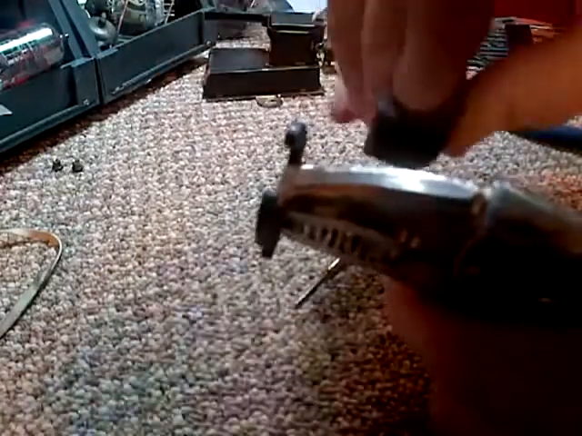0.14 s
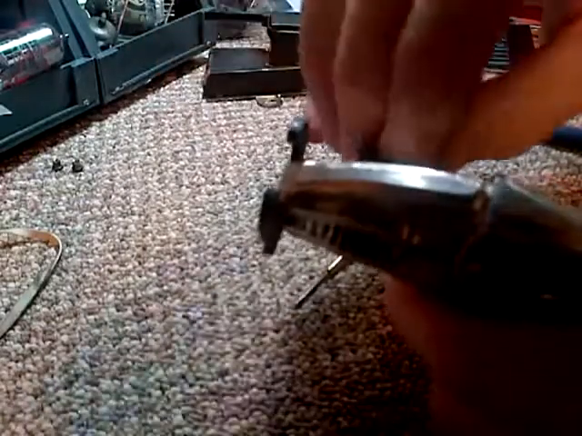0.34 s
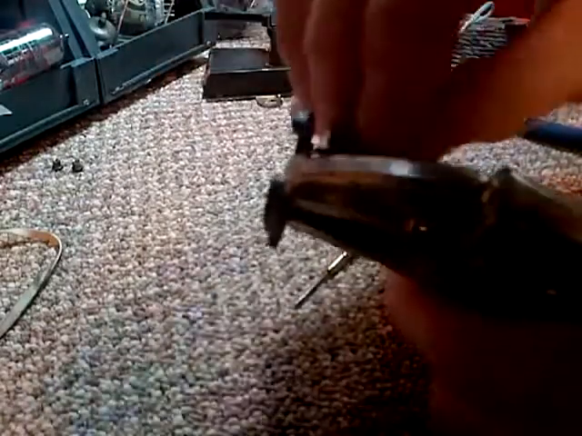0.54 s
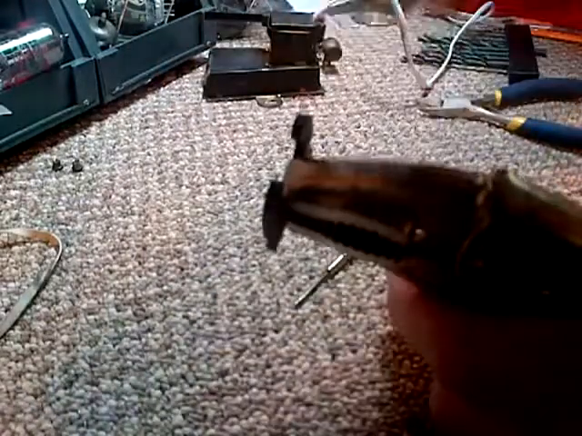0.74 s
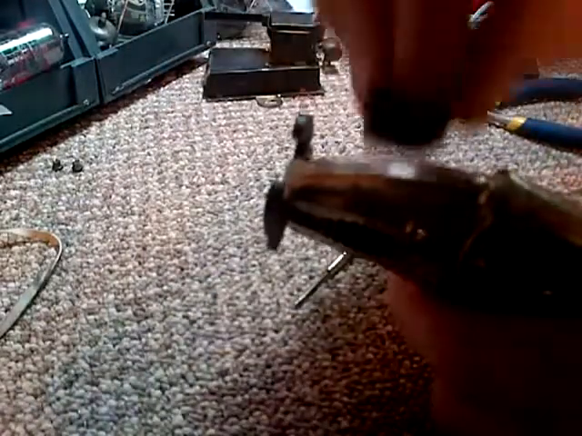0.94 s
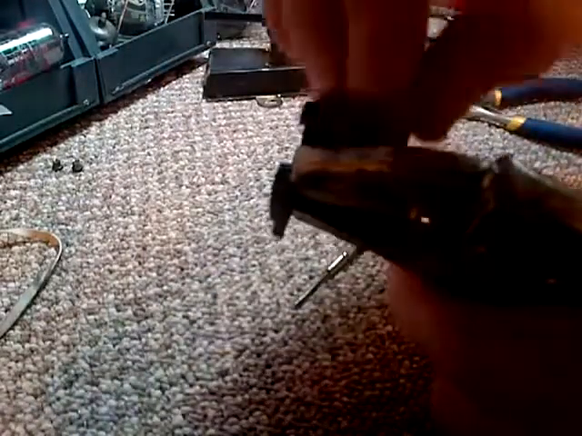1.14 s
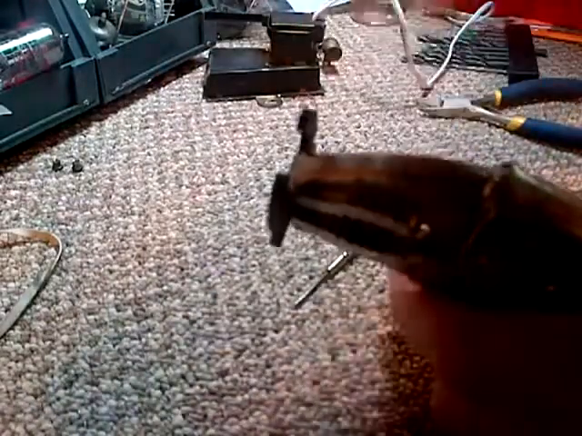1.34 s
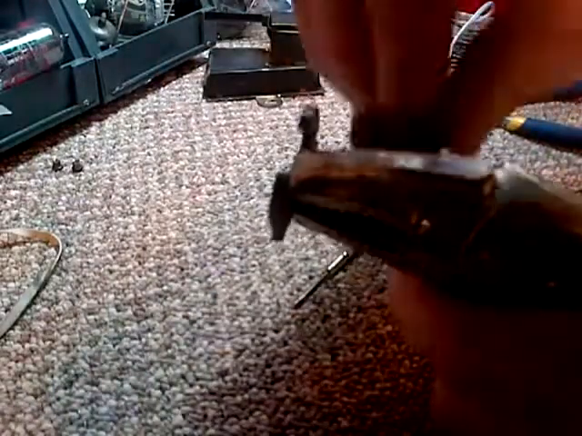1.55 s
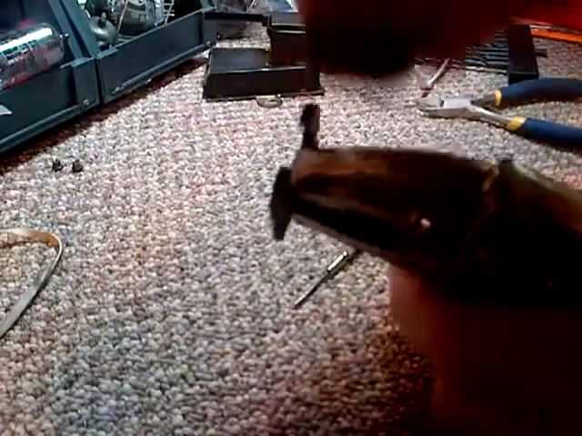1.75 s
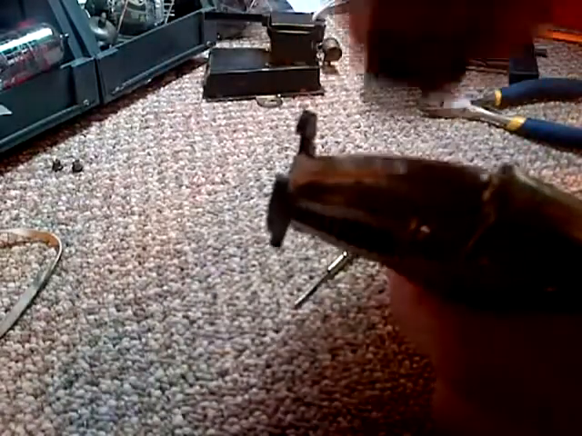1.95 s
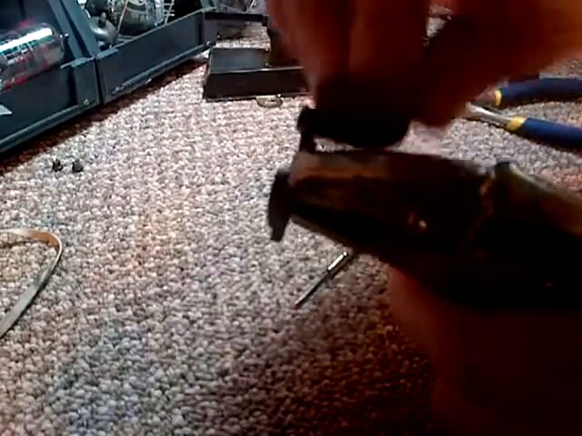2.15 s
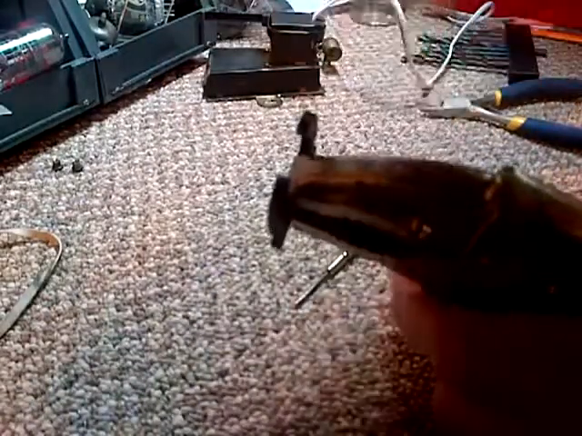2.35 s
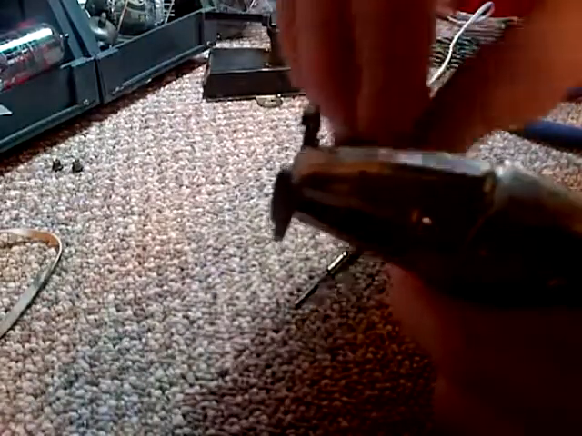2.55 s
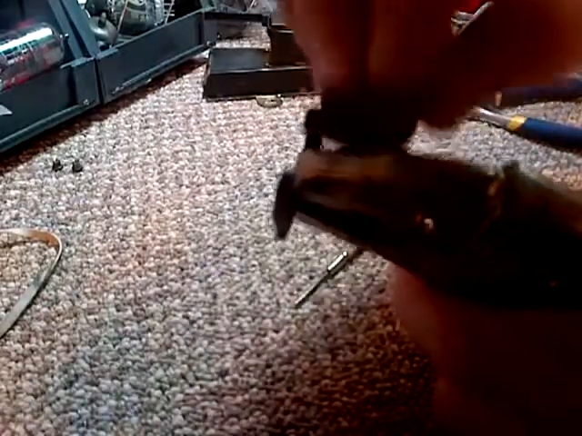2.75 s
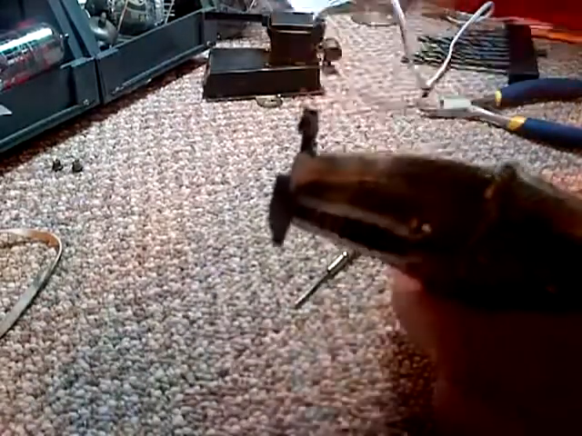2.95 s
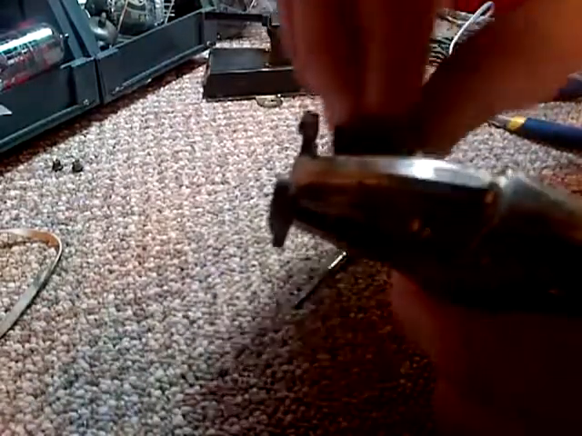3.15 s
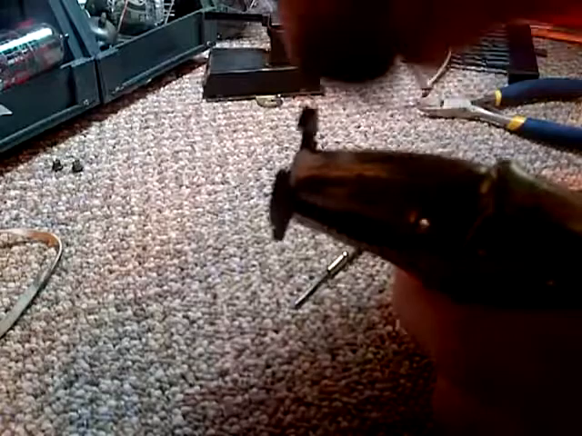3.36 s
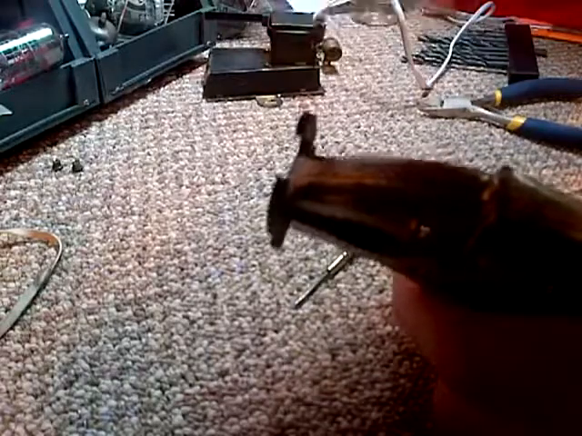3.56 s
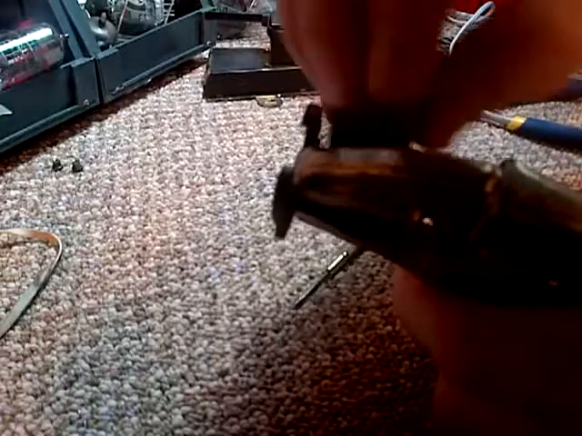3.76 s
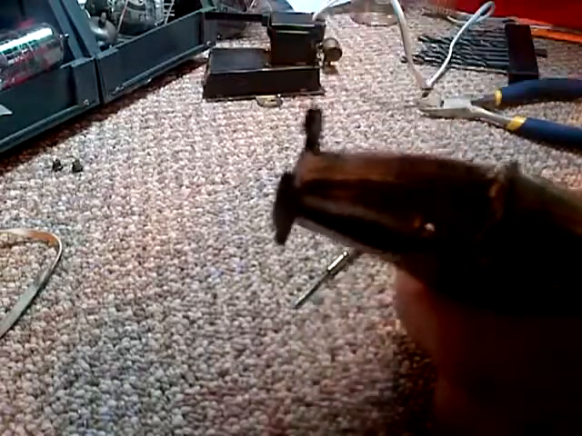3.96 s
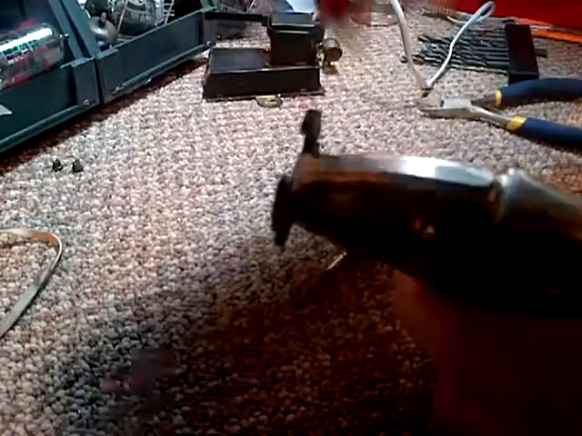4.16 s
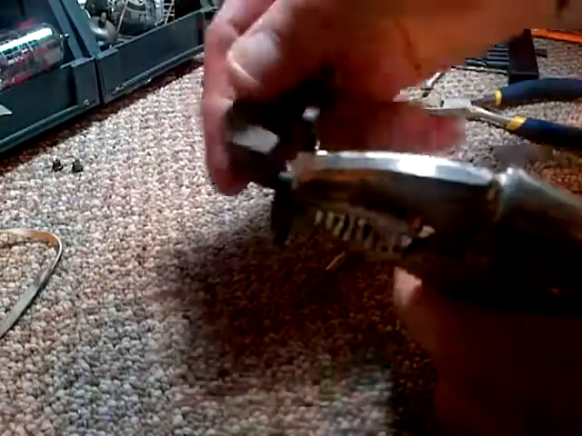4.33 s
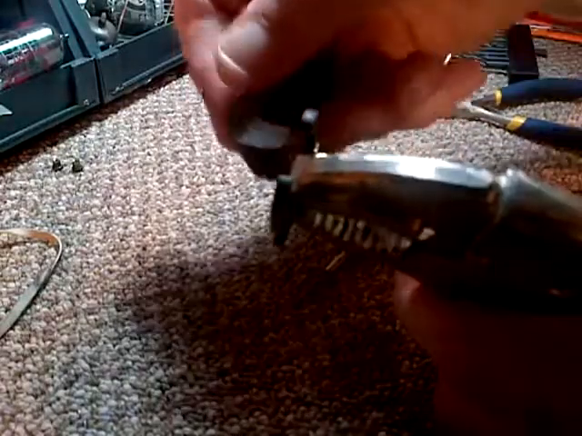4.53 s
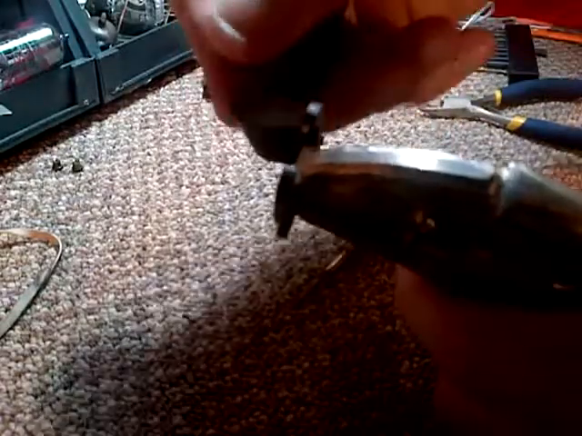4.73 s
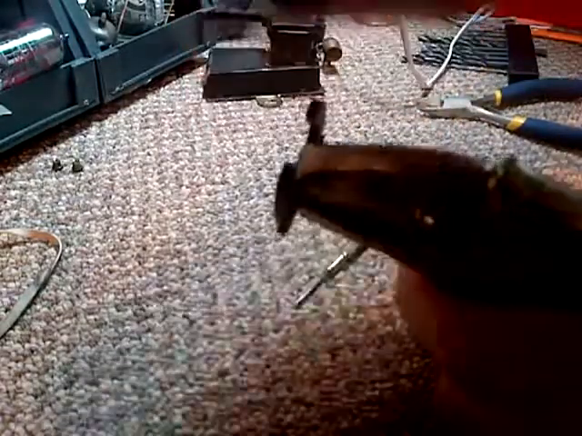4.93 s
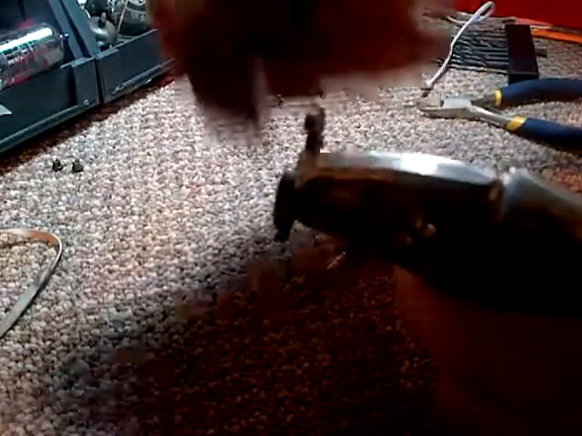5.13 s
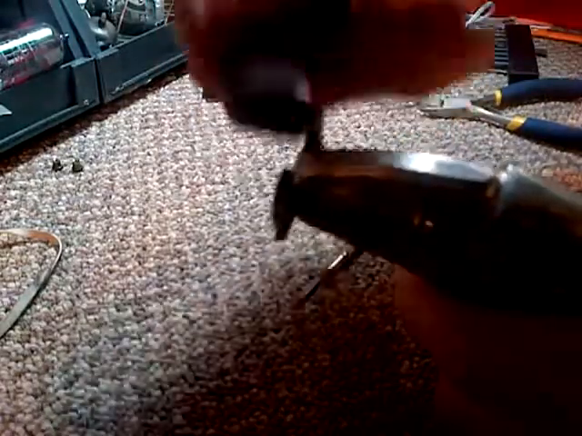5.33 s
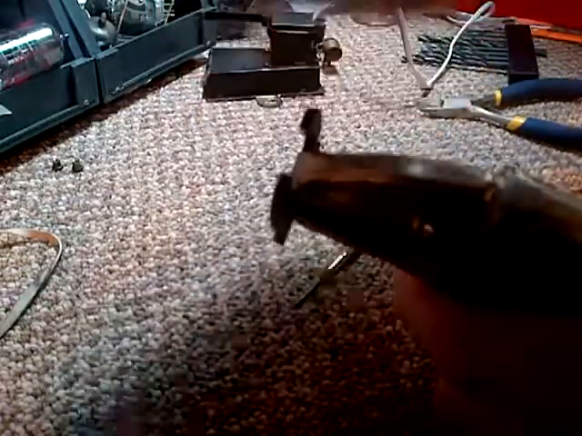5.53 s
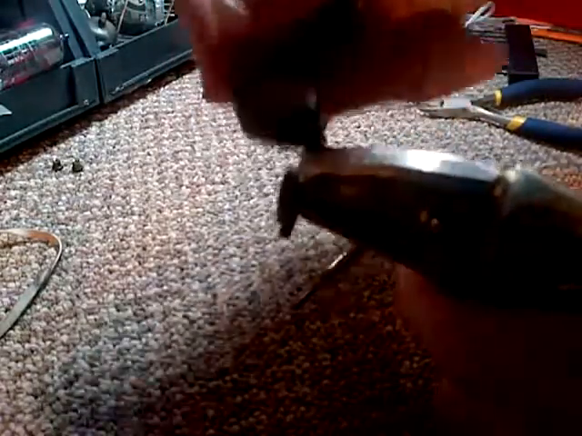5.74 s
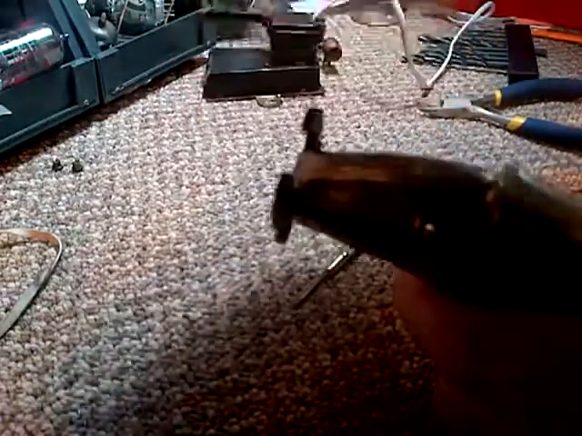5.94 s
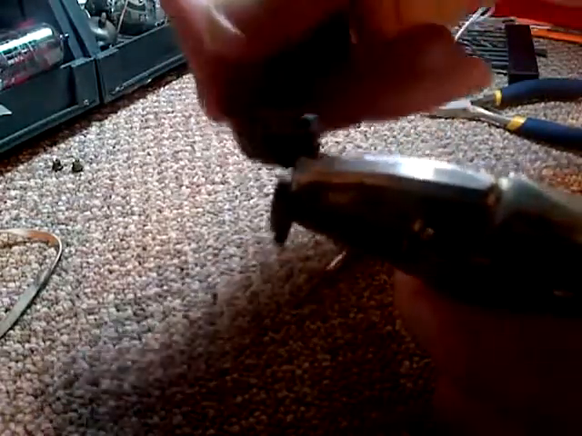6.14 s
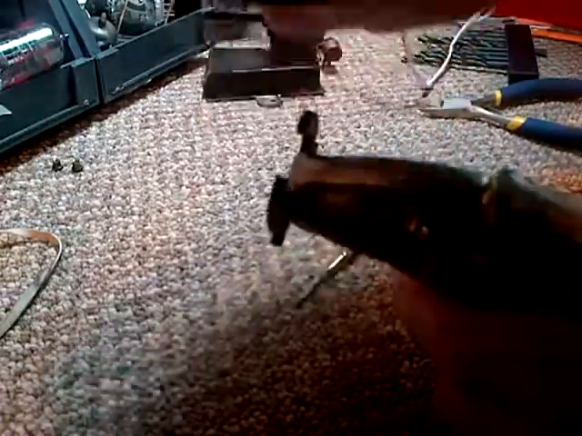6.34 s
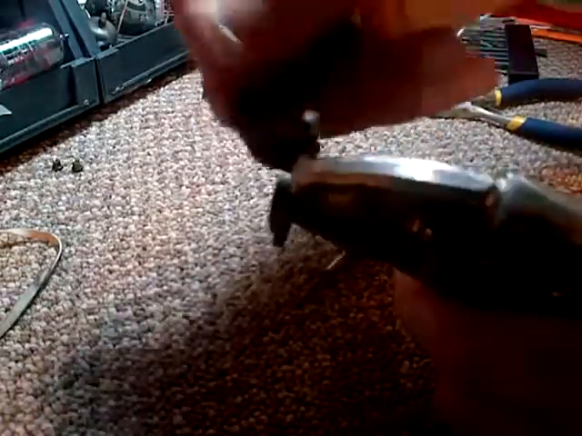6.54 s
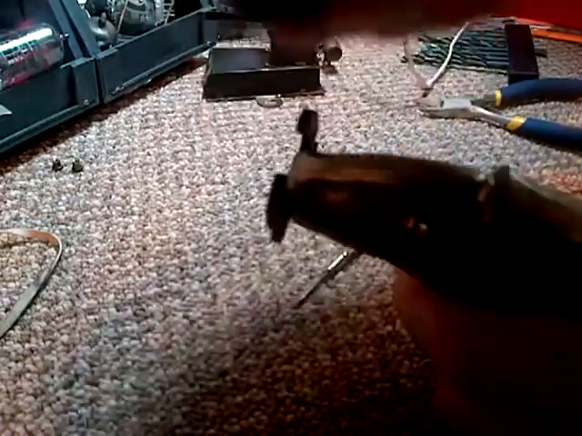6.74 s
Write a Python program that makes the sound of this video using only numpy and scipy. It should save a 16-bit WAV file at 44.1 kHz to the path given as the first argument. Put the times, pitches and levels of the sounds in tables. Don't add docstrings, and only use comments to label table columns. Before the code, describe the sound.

Very close to a stereo microphone, a hand snaps a small magnet onto a steel part about twice a second. Each hard click is followed by a tiny gritty scrape and a softer tear-off tick with a short thin ring. Soft low hand thumps accompany some hits. Later snaps, at the tip, are cleaner and pingier. Steady hiss, motor hum and low rumble lie underneath in a small, dry carpeted room.

```python
import sys
import numpy as np
from scipy import signal
from scipy.fft import rfft, irfft
from scipy.io import wavfile
from scipy.ndimage import uniform_filter1d

SR = 44100
rng = np.random.default_rng(int(sys.argv[2]) if len(sys.argv) > 2 else 0)


def bounce(signal):
    frames = np.transpose(np.atleast_2d(signal))
    limited = np.clip(frames, -1, 1)
    pcm = np.round(limited * 32767).astype(np.int16)
    wavfile.write(sys.argv[1], SR, pcm)


def boost_factor(decibels):
    exponent = np.asarray(decibels, float) / 20
    return 10 ** exponent


N = 299439
TIP_FROM_S = 4.5
TIP_SHADOW_DB, LEFT_LAG_S = -3.5, 17 / SR

# start t/s, peak level/dB, bass level/dB, treble level/dB, favoured mode f/Hz
TEAR_OFFS = [(0.6847, -14, -12, -4, 8700), (0.733, -11.5, -15.5, -9.5, 8200), (1.2909, -11, -19, -9, 6040),
             (1.807, -11, -20, -8.5, 4460), (2.2752, -13, -30, -3, 8560), (3.424, -13.5, -24, -7.5, 4460),
             (3.911, -13.5, -30, -7.5, 4460), (4.888, -14, -16.5, -17.5, 5270),
             (5.8104, -12, -32, -18, 5500), (6.6874, -8.5, -52, -12.5, 5820)]


def evened(x):
    return x / np.sqrt(np.mean(x ** 2) + 1e-20)


def read(points, hz):
    f, value = np.transpose(points)
    return np.interp(np.log(hz + 1), np.log(f + 1), value)


def add(mix, s, sound):
    part = mix[:, round(s * SR):][:, :sound.shape[1]]
    part += sound[:, :part.shape[1]]


def air():
    # f/Hz, level/dB per Hz
    colour = [(12, -26), (20, 1), (70, -1), (177, -10), (319, -15.5), (377, -17), (660, -22), (759, -24.5),
              (3340, -33.5), (3630, -33.5), (4420, -33.5), (14700, -36.5), (16000, -41)]
    # f/Hz, correlation [-1..1]
    likeness = [(60, 0.26), (240, 0.084), (950, 0.099), (3770, 0.053), (15000, -0.019)]
    # f/Hz, level/dB
    balance = [(60, 0), (180, -2.5), (550, -4), (1650, -2.5), (4970, -1.5), (15000, -1.0)]
    # t/s, level/dB
    rumble = [(0.0, -64), (0.05, -47), (0.76, -42.5), (0.83, -51), (1.44, -43.5), (1.55, -50.5),
              (1.83, -41.5), (2.02, -53), (2.08, -41), (3.08, -47.5), (3.21, -33.5), (3.27, -47),
              (3.33, -38), (3.46, -43.5), (6.17, -43), (6.2, -48), (6.79, -40.5)]
    hum_hz, hum_width_hz, hum_db = 57, 4.7, 8.5
    frames, hz = N // 1024 + 5, np.fft.rfftfreq(4096, 1 / SR)
    a, b, c, d = rng.standard_normal((frames, 2049, 4)).T
    same = np.clip(read(likeness, hz), -1, 1)[:, None]
    right = a + 1j * b
    left = same * right + np.sqrt(1 - same ** 2) * (c + 1j * d)
    s, rumble_db = np.transpose(rumble)
    swell_db = np.interp(np.arange(frames) * 1024 / SR, s, rumble_db + 43.5)
    swell_db = swell_db / (1 + (hz[:, None] / 90) ** 4)
    swell_db += hum_db / (1 + ((hz[:, None] - hum_hz) / hum_width_hz) ** 2)
    lean_db = read(balance, hz)[:, None] / 2
    tilt_db = np.array([lean_db, -lean_db])
    z = np.array([left, right]) * boost_factor(read(colour, hz)[:, None] + swell_db + tilt_db)
    noise = signal.istft(z, nperseg=4096, noverlap=3072)[1][:, :N]
    return boost_factor(-37) * evened(noise)


def knock(db, hz, t60):
    t = np.arange(round(t60 * SR)) / SR
    band = signal.butter(2, [hz * 0.75, hz * 1.25], "bandpass", fs=SR, output="sos")
    a, b = signal.sosfilt(band, rng.standard_normal((2, len(t))))
    attack = np.minimum(t / .012, 1)
    return evened(np.array([0.9 * a + .5 * b, a])) * boost_factor(db - 60 * t / t60) * attack


def floor_knocks(mix):
    # t/s, level/dB, pitch f/Hz, t60 t/s
    thumps = [(0.6, -30, 122, 0.17), (1.228, -27.5, 98, 0.13), (1.741, -26, 99, 0.27),
              (2.179, -21, 94, 0.14), (2.651, -23.5, 94, 0.095), (3.326, -17.5, 85, 0.098),
              (3.819, -35, 97, 0.21), (5.301, -35, 100, 0.071)]
    # t/s, level/dB, pitch f/Hz, t60 t/s
    thud = [
        (4.136, -26, 276, 0.11),
        (4.19, -43, 295, 2.3),
    ]
    for s, *row in thumps + thud:
        add(mix, s, knock(*row))


def room(x):
    t = np.arange(8000) / SR
    tail = rng.standard_normal((2, len(t))) * boost_factor(-60 * t / 0.13) * (t > .003)
    return boost_factor(-18.0) * signal.fftconvolve(x[1:], tail / np.linalg.norm(tail[0]), axes=1)[:, :N]


def ring(hz, db, t60, shadow_db, size):
    # f/Hz, level/dB
    shadow = [(300, -26), (700, 9.5), (1400, -6.5), (3200, -1), (4300, -12), (5500, -24), (8500, -12.5),
              (12000, 9)]
    t = np.arange(size) / SR
    pole = (2j * np.pi * hz - np.log(1000) / t60)[:, None, None]
    waves = (np.exp(pole * t[::100, None]) * np.exp(pole * t[:100])).reshape(len(hz), size)
    left_gain = boost_factor(read(shadow, hz) + shadow_db * (hz < 7000))
    left = left_gain * np.exp(1j * rng.standard_normal(len(hz)))
    start = boost_factor(db) * np.exp(.6j * rng.standard_normal(len(hz)))
    out = (np.array([left * start, start]) @ waves).imag
    out[0] = np.interp(t - LEFT_LAG_S, t, out[0], left=0)
    return out


def steel(s, favoured_hz, grip, favour_db=11.0):
    # f/Hz, flank level/dB, tip level/dB, t60 t/s
    modes = [(594, -43, -41, 0.12), (708, -9, -32, 0.067), (1177, -1.5, -1, 0.45), (1340, 0, -26, 0.19),
             (1420, 4, 6, 0.12), (1620, 2, -2, 0.13), (1714, -0.5, -44, 0.069), (1827, 3, 11.5, 0.17),
             (2140, 2, 9, 0.024), (2904, -21, 7, 0.067), (3253, 4, -8, 0.1), (3354, 14, 13.5, 0.069),
             (4150, 8.5, -60, 0.15), (4290, -36, -7, 0.035), (4460, 20, 22.5, 0.09), (4580, 1.5, 12, 0.2),
             (4900, -6, -18, 0.12), (5460, 8, -23, 0.084), (5220, 20, 26.5, 0.025), (6078, 10.5, 20, 0.054),
             (6220, 17.5, 10.5, 0.072), (6320, 16, 25.5, 0.029), (7400, 12.5, 5, 0.12),
             (7820, 22.5, -24, 0.015), (8700, -24, -35, 0.07), (8590, 21.5, 19, 0.031),
             (9160, 13.5, 12, 0.033), (9780, 5.5, 2, 0.055), (11130, 11, -6, 0.051)]
    # f/Hz, level/dB against the main modes
    dense = [(450, -24), (700, -17), (930, -70), (1400, -15), (2500, -26), (3200, -17), (3700, -48),
             (4500, -13), (6300, -4), (6900, -4.5), (9000, 0.5), (11400, -14.5), (12300, -22), (16000, -48)]
    hz, flank_db, tip_db, t60 = np.transpose(modes)
    tip = s > TIP_FROM_S
    db = (tip_db if tip else flank_db) + 4.5 * rng.standard_normal(len(hz))
    db = db + favour_db * np.exp(-(np.log(hz / favoured_hz) / .07) ** 2)
    t60 = 1 / (1 / t60 + grip)
    small_hz = np.linspace(450, 16000, 160) + rng.uniform(-45, 45, 160)
    small_db = read(dense, small_hz) + np.median(db)
    small_db = small_db - 14 * tip * (small_hz < 1000)
    shadow_db = tip * TIP_SHADOW_DB
    parts = []
    for lo, hi in ((0, 2400), (2400, 6900), (6900, SR)):
        big = (hz >= lo) & (hz < hi)
        small = (small_hz >= lo) & (small_hz < hi)
        part = ring(hz[big], db[big], t60[big], shadow_db, size=4000)
        part[:, :2500] += ring(small_hz[small], small_db[small], .05, shadow_db, size=2500)
        parts.append(2 * part / np.linalg.norm(part))
    return parts


def linger(s, mode_hz, db, t60):
    size = 14000
    fade = np.cos(np.linspace(0, np.pi / 2, size)) * np.minimum(np.arange(size) / 130, 1)
    wander = uniform_filter1d(rng.standard_normal(size), size=500)
    waver_db = 2.5 * evened(uniform_filter1d(wander, size=300))
    tone = ring(np.array([mode_hz]), db, t60, (s > TIP_FROM_S) * TIP_SHADOW_DB, size)
    return tone * fade * boost_factor(waver_db)


def free_rings(mix):
    # t/s, ring level/dB, mode set going most f/Hz
    freed = [(0.53, -38, 4090), (0.738, -43, 4930), (1.297, -41, 8478), (1.813, -42, 4930),
             (2.278, -50, 6070), (2.64, -41, 3965), (2.809, -41, 3265), (2.902, -49, 6070),
             (3.43, -44, 7450), (3.833, -39, 5062), (3.917, -49, 4930), (4.786, -42, 4090),
             (4.903, -46, 3265), (5.287, -32, 4090), (5.438, -45, 4590), (5.709, -31, 5062),
             (5.82, -39, 4590), (6.167, -32, 5062), (6.31, -45, 4590), (6.594, -33, 5062),
             (6.697, -38, 4590)]
    # f/Hz, level after a blow/dB, level after a tear/dB, t60 t/s
    free_flank = [(3265, -14, -5, .55), (3965, -8, -40, .5), (4090, -10, -4, .4), (4460, 0, 4, .14),
                  (4590, -9, -40, .5), (4755, -2, -40, .2), (4930, -12, -1, .65), (5062, -8, -40, .3),
                  (6070, -11, -2, .42), (7450, -40, -3, .17), (8478, -14, 2, .2)]
    free_tip = [(1560, -14, -14, .3), (2480, -16, -40, .31), (3265, -40, -9, .5), (4090, -14, -16, .4),
                (4590, -40, 0, .3), (4860, -20, -8, .25), (5062, -24, -6, .3), (6070, -18, -14, .4),
                (8478, -18, -40, .22)]
    for s, ring_db, favoured_hz in freed:
        torn = min(abs(s - row[0]) for row in TEAR_OFFS) < .015
        for hz, blow_db, tear_db, t60 in free_tip if s > TIP_FROM_S else free_flank:
            db = ring_db + (tear_db if torn else blow_db)
            if abs(np.log(hz / favoured_hz)) < .015:
                db = ring_db + 4.5
            if db > -60:
                add(mix, s, linger(s, hz, db, t60))


def slide(s, length, first_db, last_db, favoured_hz):
    t = np.arange(s, s + length, 1 / SR)
    size = len(t)
    bass_db, treble_db = (-8.5, -10) if s > TIP_FROM_S else (-5.5, -5)
    bass_db += 4.5 * (favoured_hz < 2400)
    treble_db += 9 * (favoured_hz > 6900)
    level_db = np.interp(t, [s, s + length], [first_db, last_db])
    bass_tilt_db = bass_db - 0.05 * (level_db + 14.5)
    treble_tilt_db = treble_db - 0.3 * (level_db + 38.5)

    tick_db = 3.0 * np.minimum(rng.exponential(1, size), 3.5)
    ticks = rng.standard_normal(size) * boost_factor(tick_db) * (rng.random(size) < .25)
    lumps = evened(uniform_filter1d(rng.standard_normal(size), size=200))
    ticks = evened(ticks * boost_factor(2.2 * lumps)) * signal.windows.tukey(size, .12)
    ticks = signal.sosfilt(signal.butter(6, 12300, fs=SR, output="sos"), ticks)
    wander = uniform_filter1d(uniform_filter1d(rng.standard_normal((3, size)), size=300), size=200)
    parts = steel(s, favoured_hz, grip=18., favour_db=14.0)
    sound = 0
    for part, tilt_db, w in zip(parts, (bass_tilt_db, 0, treble_tilt_db), wander):
        drive = ticks * boost_factor(level_db + tilt_db + 2.4 * evened(w))
        sound = sound + signal.fftconvolve(part, drive[None], axes=1)
    return sound


def slides(mix):
    strokes = [(0.535, 0.056, -32, -46, 708), (0.575, 0.038, -23.5, -69, 1620),
               (0.632, 0.063, -47.5, -21, 1620), (0.689, 0.046, -22.5, -30.5, 5220),
               (1.163, 0.12, -31, -24.5, 3400), (1.702, .106, -28.5, -28, 3200),
               (2.187, 0.036, -34, -51, 1340), (2.216, 0.06, -44, -48.5, 8590),
               (2.273, 0.014, -28, -59, 1340), (2.652, 0.062, -17.5, -69, 4460),
               (2.819, 0.079, -27.5, -58, 3160), (2.906, 0.02, -51, -58, 3260),
               (3.295, 0.12, -39.5, -45.5, 1390), (3.428, 0.023, -31, -66, 1420),
               (3.846, 0.063, -41, -56, 1340), (3.912, 0.027, -31.5, -52, 1340),
               (4.902, 0.061, -30, -59, 1730), (5.292, 0.076, -44.5, -48, 2904),
               (5.367, 0.077, -26, -59.5, 2250), (5.818, 0.062, -25.5, -52.5, 1420),
               (6.225, 0.074, -60, -47.5, 1820), (6.698, 0.079, -21, -60, 1910)]
    for row in strokes:
        add(mix, row[0], slide(*row))


def contact(s, peak_db, bass_db, treble_db, favoured_hz, grip, rise_ms, chatter_ms, blow):
    bass, middle, treble = steel(s, favoured_hz, grip)
    ms = np.arange(2048) / SR * 1000
    shape = np.minimum(ms / rise_ms, 1) ** 2 * np.exp(-np.maximum(ms - rise_ms, 0) / chatter_ms)
    drive = rng.standard_normal(len(ms)) * shape
    for _ in range(4):
        spectrum = rfft(drive)
        even = irfft(spectrum / abs(spectrum))
        drive = even * shape / np.sqrt(uniform_filter1d(even ** 2, size=40) + 1e-12)
    drive /= np.linalg.norm(drive)
    drive[0] += blow
    body = boost_factor(bass_db + 5) * bass + middle + boost_factor(treble_db + 10.5) * treble
    sound = signal.fftconvolve(body, drive[None], axes=1)
    sound /= abs(sound).max()
    crack = blow * boost_factor(-12.5 - ms * 29.0) * np.gradient(rng.standard_normal(len(ms)))
    sound[:, :len(ms)] += [.55 * np.roll(crack, round(LEFT_LAG_S * SR)), crack]
    return boost_factor(peak_db + 6.5) * sound


def tears(mix):
    for row in TEAR_OFFS:
        rise_ms = 7.5 if row[0] > TIP_FROM_S else 4
        add(mix, row[0], contact(*row, grip=0.71, rise_ms=rise_ms, chatter_ms=4.5, blow=.01))


def rocks(mix):
    # t/s, peak level/dB, bass level/dB, treble level/dB, favoured mode f/Hz
    touches = [(0.2484, -41, -17, -23, 1600), (0.5813, -15, -1, -8, 1730), (1.1847, -23, 11, -34, 3300),
               (1.2004, -8.5, -6, -6, 8550), (1.719, -9, -12, -9, 5900), (2.1796, -14.5, -5, -18, 1340),
               (2.229, -21, -14, 24, 9050), (2.6561, -15, -2.5, -36, 5500), (2.6711, -47, 12, -13, 1420),
               (2.9012, -20.5, -33, -17, 5930), (3.3209, -23, -14, -28, 5220), (3.383, -25.5, -2, -6, 1420),
               (5.3695, -16, -34, -14, 5330), (5.435, -24.5, -38, -39, 4460), (6.234, -24.5, -6, -17, 1850),
               (6.2688, -36, 2, -22, 1760), (6.3083, -27, -28, -49, 4900)]
    for row in touches:
        add(mix, row[0], contact(*row, grip=6.4, rise_ms=0.88, chatter_ms=2.62, blow=0.18))


def snaps(mix):
    # t/s, peak level/dB, bass level/dB, treble level/dB, favoured mode f/Hz
    landings = [(0.5293, -6, -10.5, -25, 3330), (1.163, -11, -1, -29, 3260),
                (1.6963, 2.5, -16.5, -20, 5100), (2.159, -9, -8.5, -16.5, 6460),
                (2.6385, -1, -11, -17.5, 6050), (2.808, 1.5, -11, -12.5, 3180),
                (3.289, -10.5, -4, -8, 6220), (3.831, -2, -5.5, -4, 1340),
                (4.7853, -10.5, -13, -16.5, 4480), (5.2853, 3, -27, -44, 6220),
                (5.7077, -2, -19.5, -17, 5390), (6.1663, -1, -56, -20, 5170),
                (6.5942, -2, -19, -19.5, 5550)]
    for row in landings:
        add(mix, row[0], contact(*row, grip=13.5, rise_ms=0.074, chatter_ms=3.73, blow=0.94))


def thinned(magnet):
    flank, tip = (signal.sosfilt(signal.butter(4, hz, "highpass", fs=SR, output="sos"), magnet)
                  for hz in (518, 860))
    return np.where(np.arange(N) / SR > TIP_FROM_S, tip, flank)


def scene():
    floor = air()
    floor_knocks(floor)
    magnet = np.zeros((2, N))
    slides(magnet)
    tears(magnet)
    rocks(magnet)
    snaps(magnet)
    magnet = thinned(magnet)
    magnet = magnet + room(magnet)
    free_rings(magnet)
    return magnet + floor


def top_cut(x):
    return signal.sosfilt(signal.butter(12, 16600, fs=SR, output="sos"), x)


def record(dry):
    edge = signal.firwin(255, 16100, window=("kaiser", 9), fs=SR)
    mix = signal.oaconvolve(np.clip(dry, -1, 1), edge[None], "same")
    return top_cut(mix)


dry = scene()
out = record(dry)
bounce(out)
```